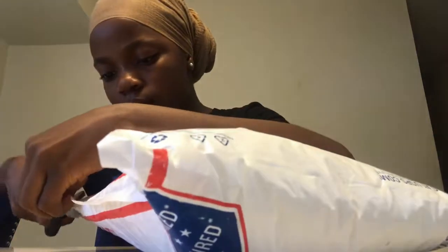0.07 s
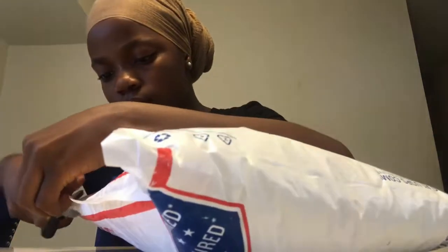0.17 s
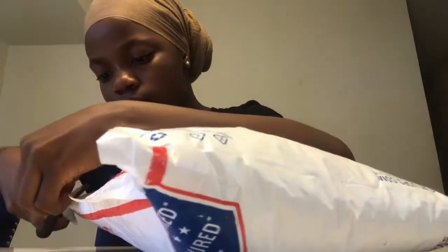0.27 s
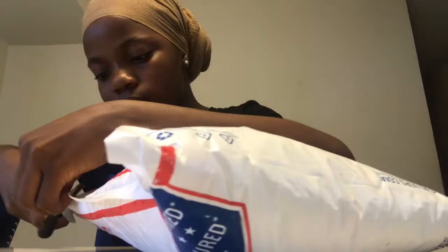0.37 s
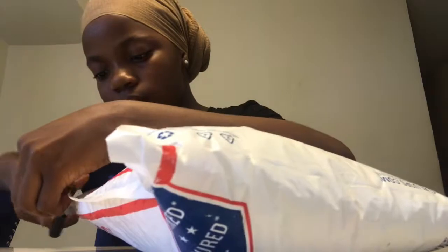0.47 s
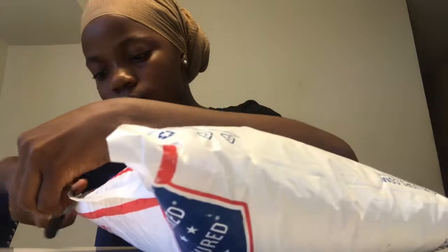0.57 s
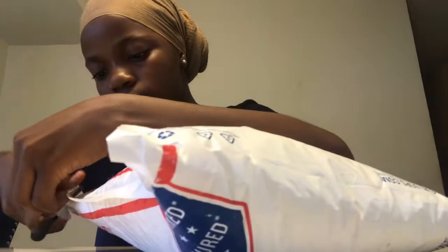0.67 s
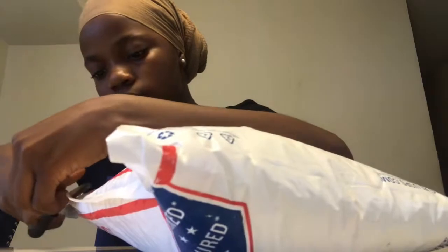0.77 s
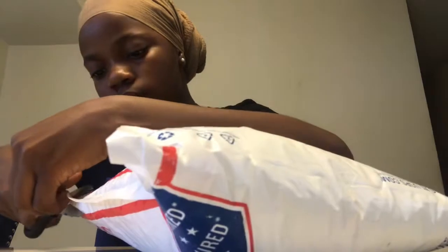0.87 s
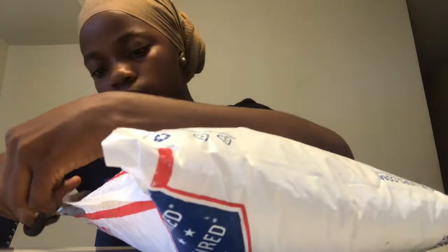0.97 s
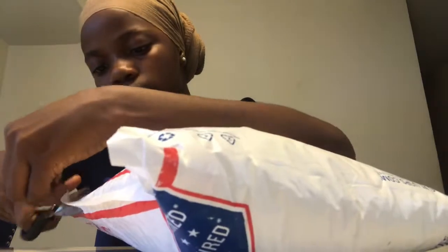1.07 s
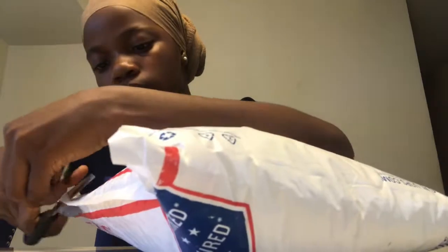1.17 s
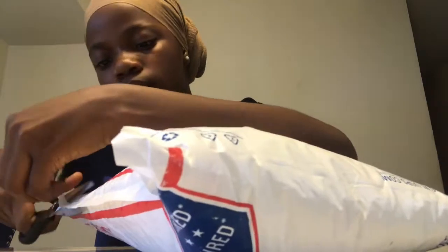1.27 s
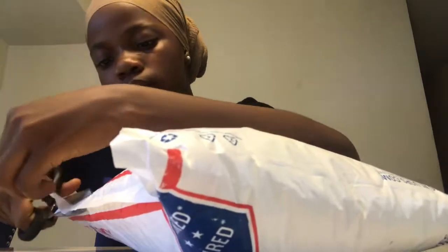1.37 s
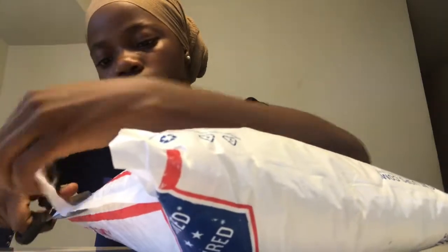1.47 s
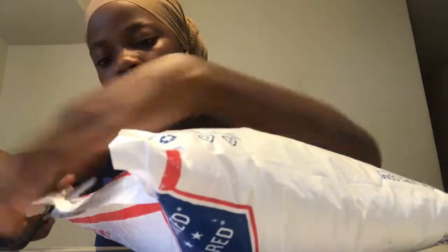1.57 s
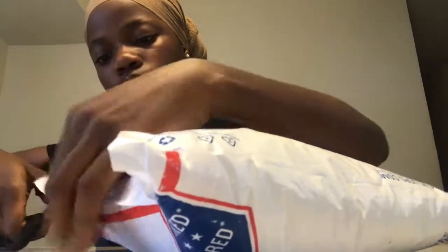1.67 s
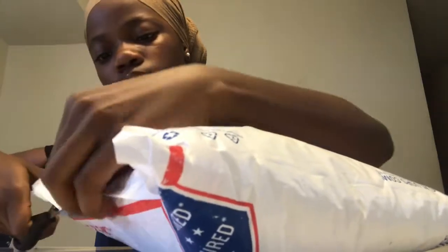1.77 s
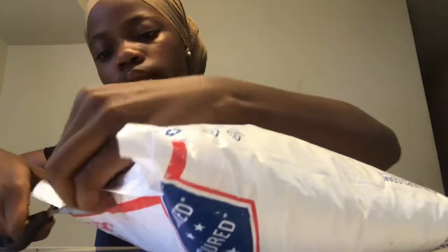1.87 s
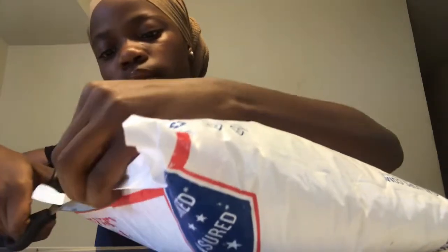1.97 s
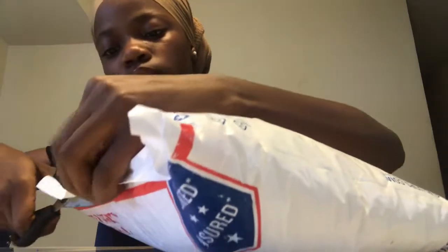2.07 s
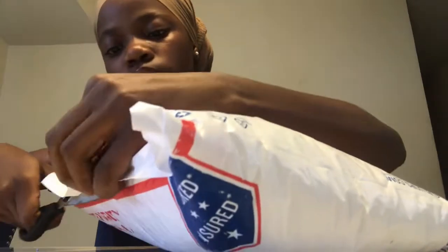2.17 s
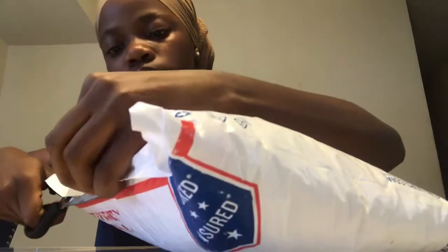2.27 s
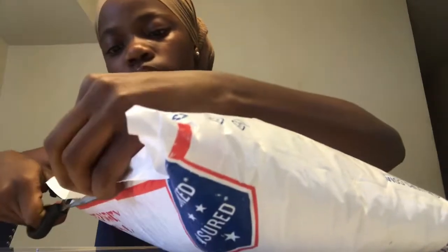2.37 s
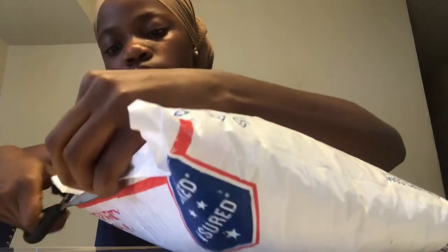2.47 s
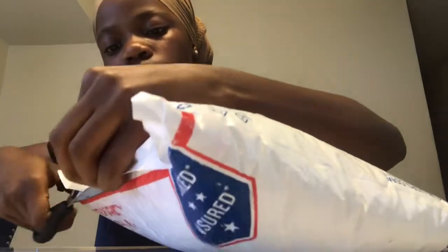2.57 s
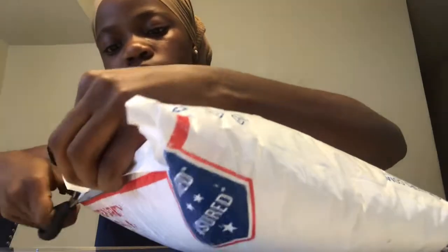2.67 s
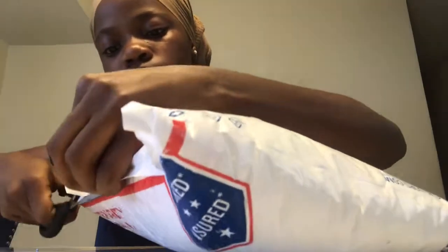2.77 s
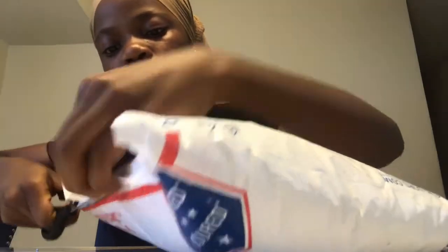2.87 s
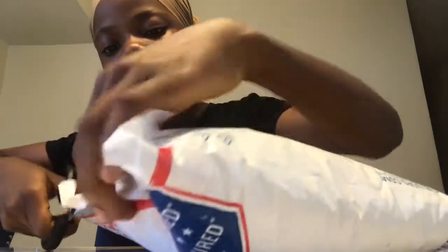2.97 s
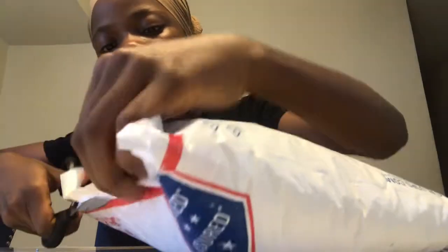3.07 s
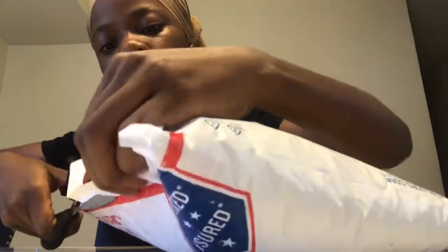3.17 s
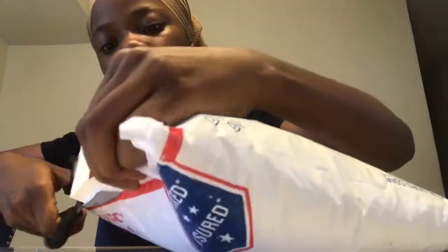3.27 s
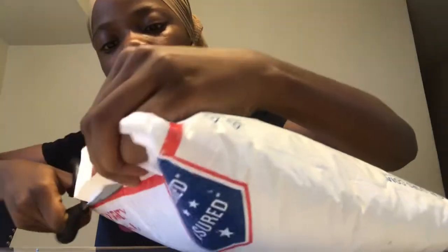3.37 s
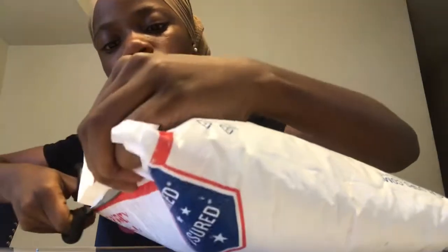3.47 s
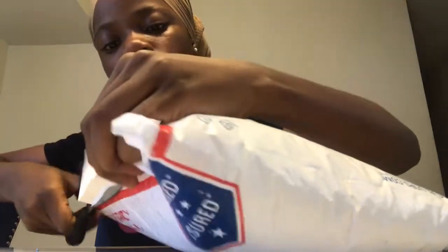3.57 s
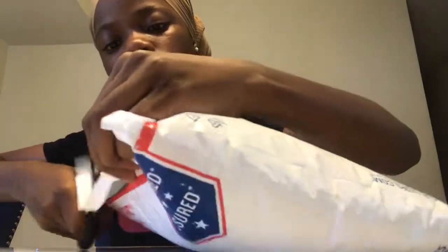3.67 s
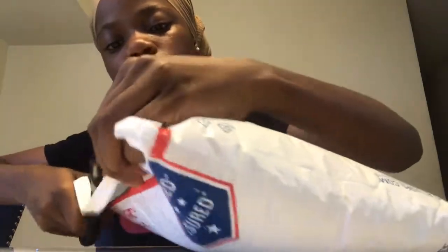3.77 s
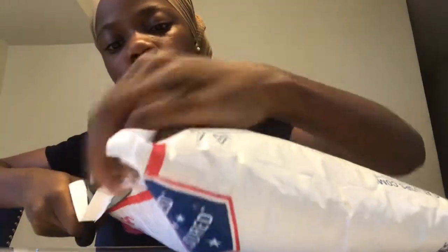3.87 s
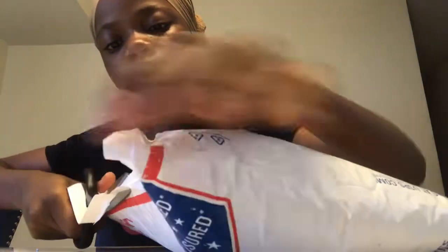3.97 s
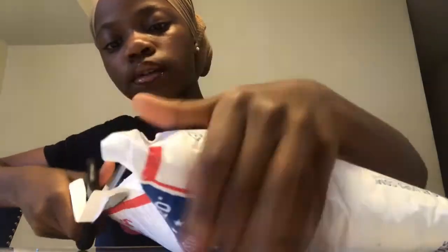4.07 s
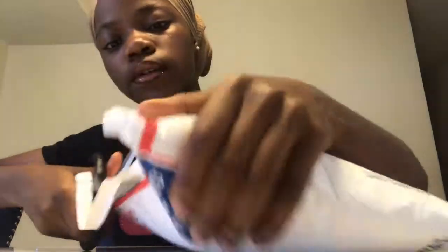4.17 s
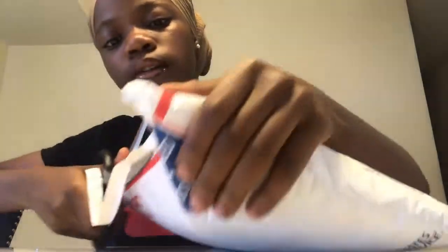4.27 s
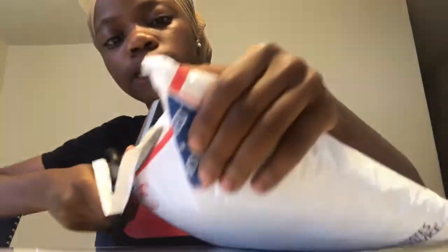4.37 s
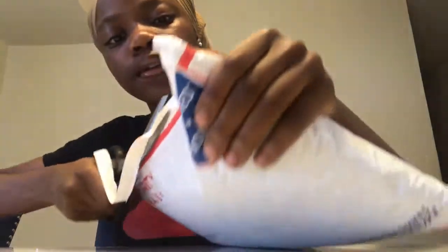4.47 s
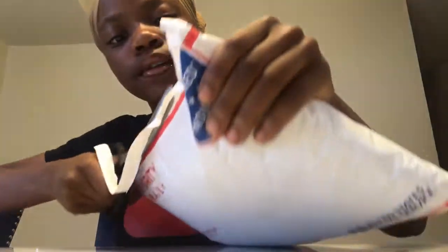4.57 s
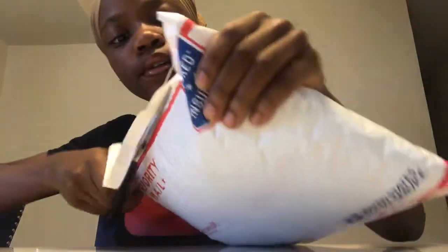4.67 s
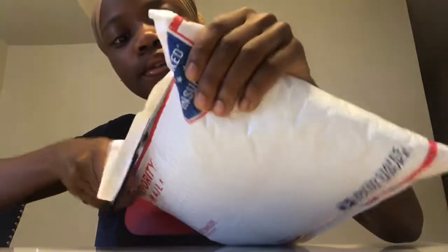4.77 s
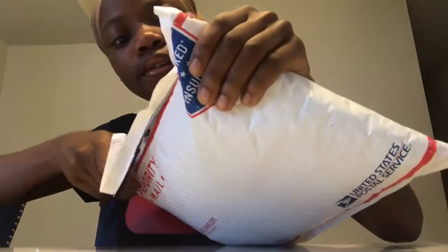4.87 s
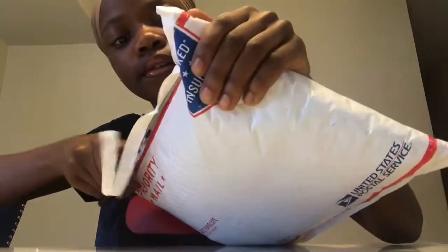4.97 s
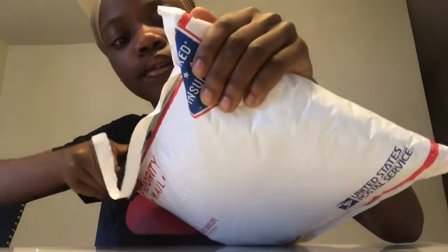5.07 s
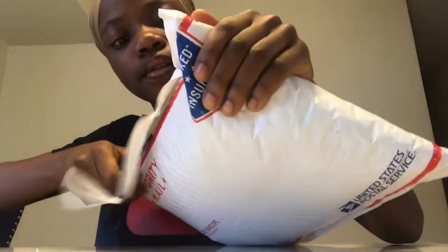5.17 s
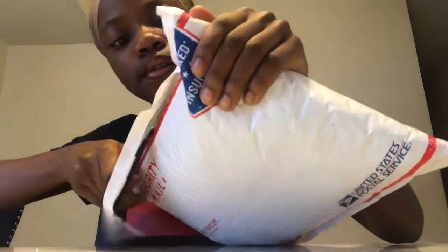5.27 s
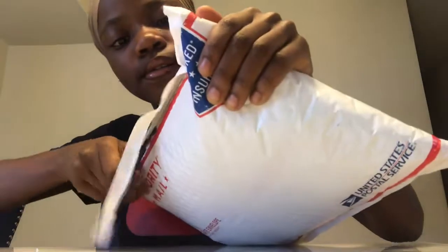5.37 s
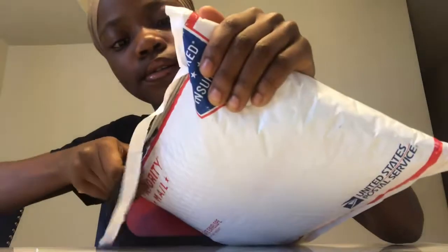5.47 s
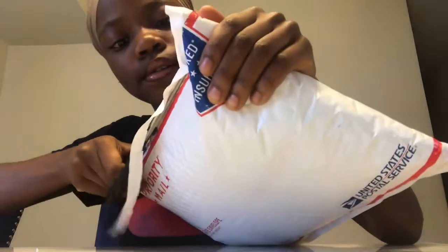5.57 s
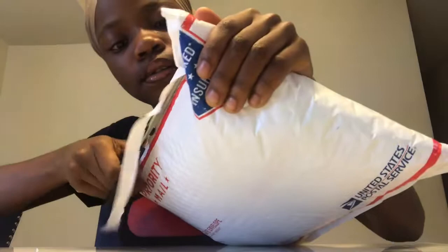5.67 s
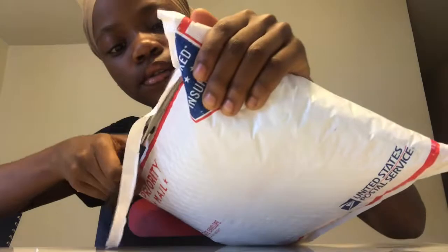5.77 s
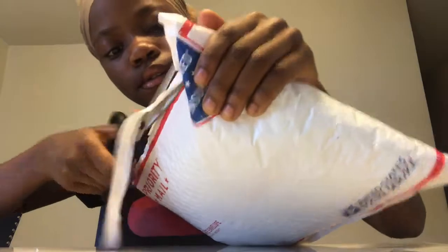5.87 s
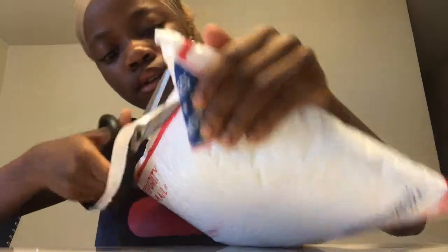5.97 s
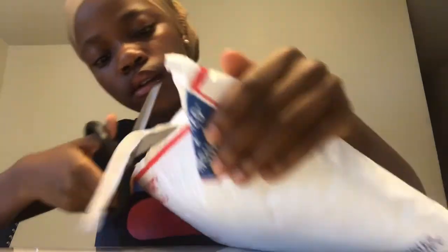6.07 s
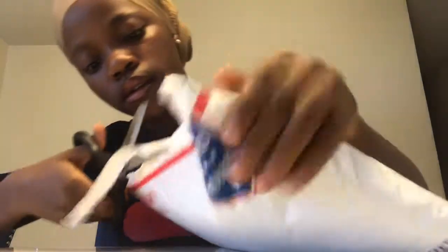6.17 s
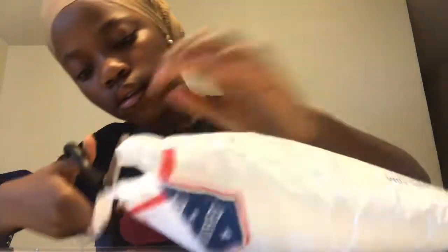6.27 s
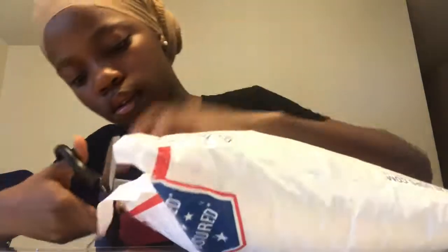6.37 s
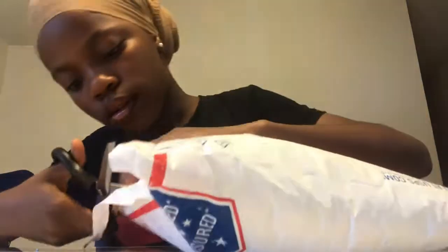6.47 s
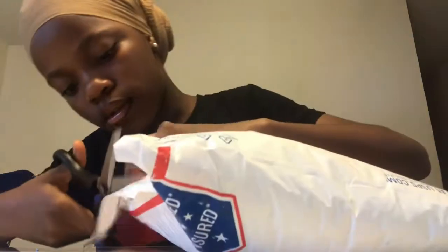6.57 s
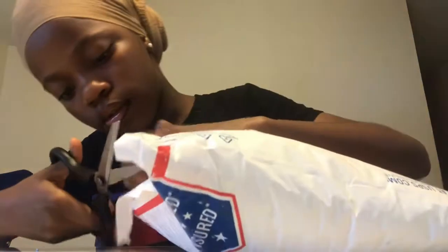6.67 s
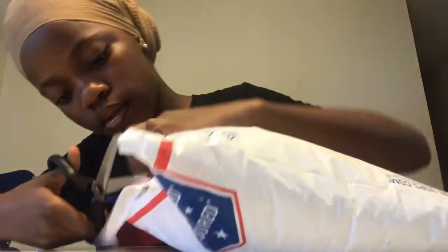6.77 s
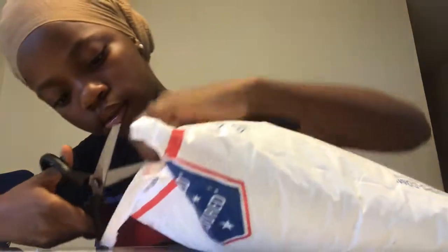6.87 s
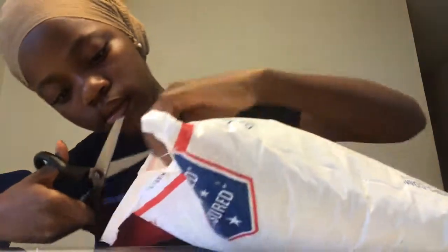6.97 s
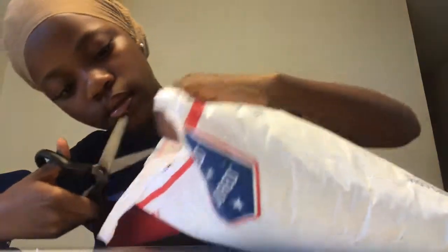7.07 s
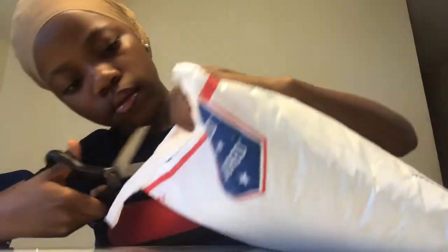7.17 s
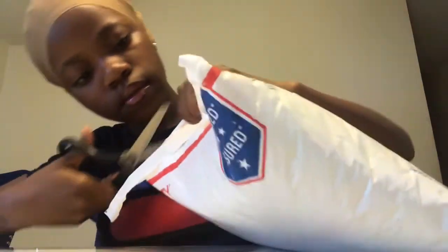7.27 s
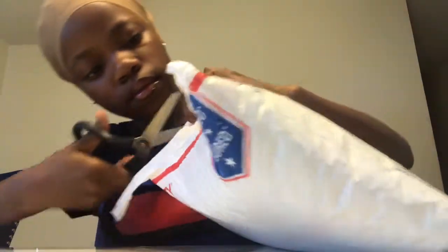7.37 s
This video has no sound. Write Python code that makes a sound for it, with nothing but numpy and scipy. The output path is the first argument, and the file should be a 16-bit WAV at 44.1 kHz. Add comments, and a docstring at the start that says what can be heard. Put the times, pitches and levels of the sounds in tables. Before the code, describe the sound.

A padded plastic mailer is handled and cut with scissors very near the microphone in a small, quiet room. From 0 to 1 s there are light crinkles, a small snap cluster near 0.1 and a firmer one with a soft thump around 0.5. From 1.2 to 2.9 s, dry cracks come steadily over short brushing rustles, a strong one near 1.6. At 3.0 s a loud sharp crack with a bump lands, then more crackling. Around 3.6 to 4.5 s the bag is shifted: dense rustle, snaps and the heaviest hollow thumps, near 4.0 to 4.1. From 4.7 to 6 s it is calmer, with scattered crinkles, bright ticks and muffled bumps. A vigorous crackling burst peaks at 6.25 to 6.5, another snap follows near 6.8, then it tapers into lighter rustling to about 7.4. Faint air and a low wavering hum continue throughout.

```python
"""Padded mailer gripped and cut

A padded plastic mailer is gripped, turned and snipped with scissors close to a microphone in a small room.
Creases snap as cracks with damped panel rings; strokes of the hand swell a rustle of tiny buckles and hiss.
Stiff edges tick, wrinkles let go, and the air-filled bag thumps as decaying tones under soft pushes.
Near walls answer with a faint noise tail over shaped-noise room air and a low wavering hum."""
import sys
import numpy as np
from scipy import signal
from scipy.fft import rfft, irfft, next_fast_len
from scipy.io import wavfile

SR = 44100
rng = np.random.default_rng(int(sys.argv[2]) if len(sys.argv) > 2 else 0)


def put_to_file(sound):
    """Save the sound as 16-bit audio at rate SR, in the file named by the first command-line argument."""
    columns = np.atleast_2d(sound).T  # one column per channel
    safe = np.clip(columns, -1, 1)
    whole_steps = np.round(safe * 32767)
    wavfile.write(sys.argv[1], SR, whole_steps.astype(np.int16))


N = 326781


def undb(db):
    """Decibels to gain."""
    return 10 ** (np.asarray(db) / 20)


def unit(x):
    """Scale to rms 1."""
    return x / np.sqrt(np.mean(x ** 2) + 1e-20)


def colour(points, hz):
    """Gain at hz from (Hz, dB) points, interpolated over log frequency."""
    point_hz, point_db = np.transpose(points)
    return undb(np.interp(np.log(hz + 1), np.log(point_hz), point_db))


def shape(x, gain_at):
    """Filter by a zero-phase gain that is a function of frequency."""
    size = next_fast_len(len(x) + 4096, True)
    hz = np.arange(size // 2 + 1) * SR / size
    return irfft(rfft(x, size) * gain_at(hz), size)[:len(x)]


def walk(knots_per_s):
    """Random wander: straight lines between normal random knots."""
    knots = rng.standard_normal(4096)
    return np.interp(np.arange(N) / SR * knots_per_s, np.arange(len(knots)), knots)


def ring(x, hz, q):
    """A damped resonance."""
    hz = min(hz, SR / 3)
    b, a = signal.iirpeak(hz, max(q, 3 * hz / SR), fs=SR)
    return signal.lfilter(b, a, x)


def edge(x, hz, kind, order=2):
    """Butterworth high-pass or low-pass."""
    b, a = signal.butter(order, min(hz, SR / 2.2), kind, fs=SR)
    return signal.lfilter(b, a, x)


def add(out, at_s, burst, db):
    """Mix in a burst whose energy equals that of 1 ms at the given rms level."""
    start = max(int(at_s * SR), 0)
    burst = burst * undb(db) * np.sqrt(SR / 1000 / np.sum(burst ** 2))
    out[start:start + len(burst)] += burst[:max(N - start, 0)]


def flip(t, noise, rise_s, fall_s, scrape):
    """Force of a buckle: noise builds up, a one-sample snap falls at t = 0, the scrape dies away."""
    snap = np.abs(t) < .5 / SR
    return snap + scrape * noise * np.exp(-np.abs(t) / np.where(t < 0, rise_s, fall_s))


def strokes(steepness=2.8, rest_db=-61, grip_knots_per_s=28, grip_db=1.14):
    """Drive of the film's middle, body and sizzle: each stroke is one rounded arch, summed in power."""
    # slides, squeezes and cuts: (peak time [s], swell to peak from half amplitude [s],
    # fade to half amplitude [s], level [dB], extra body [dB], extra sizzle [dB])
    stroke_rows = [(0.32, 0.04, 0.035, -44.5, -13, 4.5), (0.44, 0.04, 0.05, -46, -2, 4),
                   (0.504, 0.015, 0.025, -42.0, -13, 1.5), (0.565, 0.015, 0.028, -39.5, 5, -1),
                   (0.679, 0.016, 0.061, -50.5, 0, 2), (0.809, 0.049, 0.069, -45.0, -3, -1.5),
                   (0.977, 0.038, 0.051, -44.0, 9.5, 0.5), (1.152, 0.045, 0.11, -44.5, -1, -1),
                   (1.197, 0.014, 0.028, -34.5, -10, -28), (1.302, 0.015, 0.047, -47.0, 11.5, 1),
                   (1.429, 0.059, 0.046, -42.0, 1.5, -8), (1.595, 0.02, 0.04, -41.5, 8, -25),
                   (1.81, 0.089, 0.013, -44.0, -7, 1), (2.006, 0.16, 0.105, -41.5, 0, 1),
                   (2.277, 0.008, 0.028, -37, -2, -8), (2.333, 0.229, 0.146, -46.5, 3, -2.5),
                   (2.498, 0.008, 0.115, -41.5, 2, 0), (2.737, 0.056, 0.074, -45.0, 7, -4),
                   (2.924, 0.069, 0.124, -40.5, -2.5, -7), (3.019, 0.017, 0.017, -30, 8, -2),
                   (3.11, 0.06, 0.05, -42, 5.5, -1), (3.19, 0.025, 0.03, -41.5, 2, -8),
                   (3.406, 0.142, 0.072, -41.0, 2, -4), (3.647, 0.022, 0.095, -34.5, 0.5, -1.5),
                   (3.854, 0.07, 0.032, -37.5, -3.5, -4), (3.991, 0.083, 0.017, -41.0, 8, 3),
                   (4.003, 0.01, 0.021, -30.0, 4.5, -6.5), (4.149, 0.012, 0.014, -30, 13, 0.5),
                   (4.234, 0.071, 0.058, -35.0, -2, 2), (4.423, 0.06, 0.033, -33.0, -5, -11),
                   (4.525, 0.113, 0.087, -46.5, 11.5, 5), (4.695, 0.017, 0.049, -40.0, 7, 0),
                   (4.795, 0.028, 0.03, -42, 6, 6.5), (4.88, 0.06, 0.1, -53, 9.5, 1),
                   (5.065, 0.06, 0.03, -42, 8.5, -4), (5.143, 0.053, 0.042, -44.0, 10.5, 5.5),
                   (5.279, 0.037, 0.055, -40, 8.5, 1.5), (5.549, 0.13, 0.072, -50.0, 11.5, 5),
                   (5.741, 0.021, 0.103, -48.0, 11.5, 2), (5.875, 0.017, 0.095, -48.0, 11.5, 6),
                   (6.135, 0.101, 0.042, -39.5, 1, 1), (6.267, 0.028, 0.019, -35.0, 3.5, 2.5),
                   (6.368, 0.14, 0.054, -35.5, -4, 0), (6.486, 0.01, 0.042, -43.0, 5.5, -18),
                   (6.619, 0.014, 0.048, -33.5, -8, -3), (6.675, 0.147, 0.157, -42.5, 1.5, 7),
                   (6.787, 0.024, 0.049, -35.0, 6, 1), (6.943, 0.127, 0.086, -46.0, 0.5, 3),
                   (7.16, 0.08, 0.08, -45.0, 4, 4.5), (7.34, 0.08, 0.1, -47.0, 2, 2)]
    t = np.arange(N) / SR
    # between strokes the held bag still stirs
    power = np.full((3, N), undb(rest_db) ** 2)
    for peak_s, swell_s, fade_s, db, body_db, sizzle_db in stroke_rows:
        distance = np.maximum((peak_s - t) / swell_s, (t - peak_s) / fade_s)
        arch = 1 / (1 + distance ** steepness)
        power += np.outer(undb([db, db + body_db, db + sizzle_db]), arch) ** 2
    # the grip slips and catches
    return np.sqrt(power) * undb(grip_db * walk(grip_knots_per_s))


def rustle(drive, slide_db=-11, slide_hz=4200, flicker_db=4.5, mid_db=1.0, body_db=0, sizzle_db=1.0):
    """Buckling carries the middle of the rustle; the hiss of sliding film takes over in the treble."""
    # colour of the rustling film: (frequency [Hz], spectrum level [dB])
    film_colour = [(35, 3), (130, -7), (370, -7.5), (720, -5.5), (1100, -0.5), (2000, -5), (4200, -7.5),
                   (6300, -10), (10000, -15.5), (16000, -14)]

    def slide(f):
        return undb(slide_db) + f / slide_hz

    def buckle_gain(f):
        return colour(film_colour, f) / np.hypot(1, slide(f))

    hiss = unit(rng.standard_normal(N) * undb(flicker_db * walk(260)))
    film = unit(shape(buckles(), buckle_gain) + shape(hiss, lambda f: buckle_gain(f) * slide(f)))
    body = shape(film, lambda f: 1 / (1 + (f / 750) ** 4) - .7 / (1 + (f / 200) ** 4))
    sizzle = shape(film, lambda f: 1 - 1 / (1 + (f / 3500) ** 4))
    bands = np.array([film - body - sizzle, body, sizzle])
    return undb([mid_db, body_db, sizzle_db]) @ (drive * bands)


def buckles(rate_per_s=2400, spread_db=3.0, largest_db=15, q=4.3, cluster_db=3):
    """Tiny facets flip in swarms, each ringing a few cycles at its own pitch; scaled to rms 1."""
    # clusters: the fingers stick and slip
    chance = rate_per_s / SR * undb(cluster_db * walk(80))
    born = np.flatnonzero(rng.random(N) < chance)
    smallness, phase = rng.random((2, len(born), 1))
    size = undb(np.minimum(spread_db * rng.exponential(size=(len(born), 1)), largest_db))
    hz = 250 + 16000 * smallness ** 2
    age = np.arange(400)
    cycles = hz * age / SR
    envelope = np.exp(-np.pi * cycles / q) * (1 - np.exp(-2 * cycles))
    # hz ** .75 evens out the average spectrum
    rings = np.sin(2 * np.pi * (cycles + phase)) * envelope * size * hz ** .75
    return unit(np.bincount((born[:, None] + age).ravel(), rings.ravel(), N)[:N])


def creases(rows, ring_q=1.13, q_scatter=0.32, crack_q=2.53, rise_s=0.00055, fall_s=0.001,
            scrape=0.17, broad=0.38, rebound_db=-21):
    """A crease flips: its edge cracks, the panel beside it rings briefly, and a small rebound follows."""
    out, t = np.zeros(N), np.arange(-60, 700) / SR
    for at_s, ring_hz, ring_db, crack_hz, crack_db in rows:
        noise = rng.standard_normal((2, len(t)))
        panel_push, edge_push = flip(t, noise, rise_s, fall_s, scrape)
        # taut panels ring longer than slack ones
        q = ring_q * np.exp(q_scatter * rng.standard_normal())
        panel = ring(panel_push, ring_hz, q)
        panel = ring(panel, ring_hz, q) + broad * panel
        panel = edge(edge(panel, 200, "high"), 4600, "low")
        crack = ring(edge_push, crack_hz, crack_q)
        crack = edge(edge(crack, 1080, "high"), SR / 2.2, "low")
        rebound = (rng.uniform(0.0034, 0.011), rebound_db + 3 * rng.standard_normal())
        for lag_s, db in ((0, 0), rebound):
            add(out, at_s + t[0] + lag_s, panel, ring_db + db)
            add(out, at_s + t[0] + lag_s, crack, crack_db + db)
    return out


def small_creases(effort, rate_per_s=14, size_db=-37.0, spread_db=3.5, follow=.55, ring_hz=1450,
                  crack_hz=4000, crack_db=-1.5, scatter=0.26):
    """Rows for lesser creases, which give way at random: more often and harder with more effort."""
    strain = (effort / np.median(effort)) ** follow
    count = int(rate_per_s * N / SR)
    at = np.searchsorted(np.cumsum(strain) / np.sum(strain), rng.random(count))
    level_db = size_db + 20 * np.log10(strain[at])
    rows = []
    for i, db, (a, b, c, d) in zip(at, level_db, rng.standard_normal((count, 4))):
        panel = (ring_hz * np.exp(scatter * a), db + spread_db * b)
        crack = (crack_hz * np.exp(scatter * c), db + crack_db + spread_db * d)
        rows.append((i / SR, *panel, *crack))
    return rows


def ticks(hz=12000, q=3.0, fall_s=0.00066, scrape=1.0):
    """Stiff edges of taut film and blades let go with a very short, bright ring."""
    # glassy ticks: (time [s], relative level over 1 ms [dB])
    tick_rows = [(3.0154, -14), (3.7913, -27), (4.141, -26), (4.4644, -39), (4.4936, -34), (4.689, -29.5),
                 (5.0403, -30), (5.169, -34), (5.415, -27), (5.4646, -27), (5.6547, -32.5), (5.7359, -36.5),
                 (5.818, -39), (5.917, -33), (6.0059, -33), (6.0663, -39), (6.147, -30), (6.247, -29),
                 (6.288, -33), (6.6087, -33), (6.6154, -27)]
    out, t = np.zeros(N), np.arange(-30, 300) / SR
    for at_s, db in tick_rows:
        push = flip(t, rng.standard_normal(len(t)), .0001, fall_s, scrape)
        add(out, at_s + t[0], edge(ring(push, hz, q), 7200, "high"), db)
    return out


def wrinkles(effort, rate_per_s=45, size_db=-45, spread_db=5.0, follow=0.35, q=3.2, lateness=1.3):
    """Lone wrinkles let go with fine ticks, denser towards the end and louder with effort."""
    out, t = np.zeros(N), np.arange(200) / SR
    strain_db = follow * 20 * np.log10(effort / np.median(effort))
    for turn, small, rare in rng.random((int(rate_per_s * N / SR), 3)):
        at_s = turn ** (1 / lateness) * N / SR
        # a few stand out
        db = size_db + strain_db[int(at_s * SR)] - spread_db * np.log(rare + np.exp(-2.5))
        push = flip(t, rng.standard_normal(len(t)), 1 / SR, .0003, .35)
        tick = ring(push, 2000 * 5 ** small, q)
        add(out, at_s, edge(tick, 730, "high"), db)
    return out


def thumps(q=2.36, contact_s=0.0014, flutter=0.24, sag=0.39, sag_cycles=3.0, heave_hz=75, heave_db=-13):
    """The bag's air cushion bounces for a few cycles under a soft push, and the whole parcel heaves."""
    # pushes on the bag: (time [s], nominal pitch [Hz], relative level over 1 ms [dB])
    thump_rows = [(0.5608, 327, -26), (0.5694, 334, -32), (1.615, 170, -31.5), (2.982, 394, -25.5),
                  (3.0234, 240, -20), (3.1654, 574, -25.5), (3.679, 450, -29), (3.8393, 666, -29),
                  (4.0166, 267, -19.5), (4.0815, 210, -28), (4.1288, 250, -16), (4.585, 330, -35),
                  (4.7, 415, -27), (5.0364, 515, -29), (5.2647, 514, -24), (5.5359, 360, -25.5),
                  (5.7353, 430, -29), (6.249, 500, -44), (6.6516, 298, -25), (6.787, 417, -29),
                  (7.1448, 280, -30)]
    out, t = np.zeros(N), np.arange(3000) / SR
    for at_s, hz, db in thump_rows:
        push = (t == 0) + flutter * rng.standard_normal(len(t)) * np.exp(-t / contact_s)
        # the pitch sags as the cushion gives
        pitch_hz = hz * (0.73 + sag * np.exp(-t * hz / sag_cycles))
        bounce = np.sin(2 * np.pi * np.cumsum(pitch_hz) / SR) * np.exp(-np.pi * hz * t / q)
        cushion = signal.fftconvolve(push, bounce)[:len(t)]
        add(out, at_s, edge(cushion, 75, "high"), db)
        add(out, at_s, ring(ring(push, heave_hz, 0.81), heave_hz, 0.43), db + heave_db)
    return out


def room(x, t60_s=0.19, tail_db=-21, dull_hz=6000, gap_s=.006):
    """The walls return a faint, short tail of decaying noise."""
    t = np.arange(SR // 2) / SR
    tail = edge(rng.standard_normal(len(t)), dull_hz, "low", order=1)
    tail *= undb(-60 * t / t60_s) * (t > gap_s)
    tail *= undb(tail_db) / np.sqrt(np.sum(tail ** 2))
    return x + signal.fftconvolve(x, tail)[:N]


def background(air_db=-56.5, hum_hz=143, hum_db=-61):
    """Room air as shaped noise, and an appliance hum that wavers in pitch and level."""
    # colour of quiet room air: (frequency [Hz], spectrum level [dB])
    air_colour = [(20, -14), (60, 7), (110, 3), (280, -2), (700, -7), (1100, -11), (2600, -22), (9000, -29),
                  (16000, -46)]
    air = unit(shape(rng.standard_normal(N), lambda f: colour(air_colour, f)))
    pitch_hz = hum_hz + 3.36 * walk(10)
    hum = np.sin(2 * np.pi * np.cumsum(pitch_hz) / SR) * undb(walk(3.2))
    return undb(air_db) * air + undb(hum_db) * unit(hum)


def scene(cavity_q=11):
    """Strokes work the film, the film sets the air in the bag ringing, and the room answers."""
    # loudest creases: (time [s], panel ring [Hz], relative ring level over 1 ms [dB],
    # edge crack [Hz], relative crack level over 1 ms [dB])
    crease_rows = [(0.0591, 1700, -34.5, 5330, -34), (0.1043, 1150, -37, 2850, -29.5),
                   (0.1396, 1880, -31, 5700, -28), (0.1472, 1510, -29.5, 6350, -35),
                   (0.4294, 1720, -33, 4870, -33), (0.4532, 1680, -45, 4510, -36),
                   (0.5005, 1500, -23.5, 3900, -32), (0.5602, 1110, -31, 3560, -29.5),
                   (1.1675, 2360, -23, 3050, -35), (1.2394, 920, -37, 5370, -40),
                   (1.2917, 1470, -26.5, 4500, -22), (1.3225, 1090, -33.5, 4000, -39),
                   (1.3782, 1780, -31.5, 3700, -40), (1.4371, 1640, -26, 6960, -33),
                   (1.4568, 1590, -33, 4200, -31), (1.5521, 1110, -34, 4120, -23.5),
                   (1.5852, 1270, -17, 3640, -23.5), (1.5996, 1300, -32, 4350, -43),
                   (1.7523, 1270, -25, 4640, -31), (1.8023, 1320, -21, 2660, -24),
                   (1.8717, 1120, -30, 6300, -23.5), (1.9751, 1220, -29, 4400, -21.5),
                   (2.0248, 1950, -33, 3580, -29), (2.088, 1260, -25, 4870, -28.5),
                   (2.1037, 1250, -34, 5130, -28), (2.1614, 1940, -44, 4040, -30.5),
                   (2.2433, 1050, -30, 3590, -51), (2.3536, 1370, -46, 4770, -31),
                   (2.4328, 1380, -35, 3550, -27), (2.4972, 1240, -27.5, 3580, -30),
                   (2.5038, 1320, -26, 3000, -28), (2.6017, 1190, -29, 4120, -29.5),
                   (2.669, 1460, -29, 3440, -30.5), (2.7283, 1410, -30, 3850, -27),
                   (2.8915, 1410, -23, 4930, -27.5), (2.8988, 1390, -27, 3580, -30.5),
                   (2.95, 1350, -27, 5700, -31), (2.979, 1850, -25, 3290, -35),
                   (3.0154, 1170, -16, 3780, -8.5), (3.0237, 660, -15, 6000, -35),
                   (3.1156, 1820, -27, 2680, -24.5), (3.1651, 2100, -25.5, 3420, -16.5),
                   (3.1954, 970, -27.5, 2700, -29), (3.2754, 1530, -36, 3800, -25.5),
                   (3.6262, 1510, -27, 4080, -26), (3.6402, 1200, -23, 5600, -27),
                   (3.6727, 1040, -23, 3980, -22.5), (3.6796, 880, -18.5, 5460, -23),
                   (3.7494, 1820, -31.5, 4120, -27), (3.7914, 1160, -32, 5000, -19),
                   (3.7953, 1180, -28, 5200, -21), (3.8416, 1180, -29, 4860, -23.5),
                   (3.8631, 870, -42, 3250, -18), (4.0014, 1340, -19, 4300, -22.5),
                   (4.0112, 680, -17, 2700, -16.5), (4.0802, 1190, -25.5, 4300, -31),
                   (4.1282, 640, -22, 2700, -43), (4.1417, 1030, -17, 6600, -30),
                   (4.1493, 930, -20, 3300, -21.5), (4.1655, 2440, -40, 3620, -18),
                   (4.1838, 1080, -35, 3830, -43), (4.2236, 1280, -29, 3030, -25),
                   (4.2372, 1320, -22.5, 3300, -22.5), (4.2454, 1150, -29, 5700, -23),
                   (4.3034, 1420, -32, 5000, -27), (4.3995, 1300, -18, 2700, -26),
                   (4.4324, 1330, -16, 3300, -32), (4.494, 1440, -19, 5500, -33),
                   (4.6905, 1040, -18, 2700, -27.5), (4.7883, 1380, -31.5, 4900, -26),
                   (4.8168, 2050, -28.5, 6200, -28), (4.8395, 1130, -28, 2700, -52),
                   (5.0621, 1350, -29, 4620, -31), (5.0727, 1390, -28, 4080, -39),
                   (5.1435, 940, -27, 4340, -32), (5.2659, 960, -27, 4220, -35),
                   (5.278, 1240, -27, 4000, -51), (5.4151, 1040, -28.5, 8200, -36),
                   (5.4646, 2180, -25, 4330, -42), (5.487, 1430, -28, 5800, -56),
                   (5.5343, 850, -22.5, 2660, -29.5), (5.7357, 1500, -24.5, 2940, -27.5),
                   (5.8182, 1970, -42, 5600, -26.5), (5.9158, 835, -35, 4800, -29),
                   (6.033, 950, -33.5, 5300, -31), (6.0999, 1340, -22, 2700, -32),
                   (6.1352, 1600, -32, 3000, -33), (6.1473, 2000, -31, 5400, -29),
                   (6.248, 1100, -21.5, 3200, -24), (6.2703, 1020, -21, 3240, -18),
                   (6.274, 1720, -24, 2840, -22), (6.3369, 1920, -27, 3960, -26),
                   (6.3436, 1240, -36, 3800, -22), (6.3524, 2440, -42, 3900, -20),
                   (6.3821, 1420, -35, 2700, -23), (6.3926, 1400, -18.5, 3600, -26),
                   (6.4, 1580, -15.5, 3720, -12), (6.4245, 2250, -27, 3000, -13.5),
                   (6.4302, 1560, -25, 4300, -26), (6.4844, 1620, -14, 2940, -20),
                   (6.6155, 1410, -29.5, 6840, -21), (6.6525, 930, -22, 3380, -40),
                   (6.6568, 980, -20, 3400, -37), (6.7225, 1770, -20, 3400, -38),
                   (6.7761, 1130, -35, 7050, -22), (6.7873, 1080, -15.5, 3400, -18),
                   (6.808, 1210, -34, 5940, -24.5), (6.8305, 1340, -26.5, 2830, -25),
                   (6.925, 1290, -32, 3960, -27.5), (7.0986, 1630, -38, 5670, -30),
                   (7.1241, 980, -28, 2900, -40), (7.1553, 1150, -25.5, 6300, -24),
                   (7.1968, 1050, -25.5, 3040, -28.5)]
    # hollow resonances of the air inside the bag: (frequency [Hz], level [dB])
    cavity_modes = [(238, -26), (590, -13.5), (990, -15)]
    drive = strokes()
    effort = drive[0]
    film = rustle(drive) + wrinkles(effort)
    film += undb(4.0) * ticks() + undb(-0.4) * thumps()
    film += undb(0.5) * creases(crease_rows) + creases(small_creases(effort))
    cavity = sum(undb(db) * ring(film, hz, cavity_q) for hz, db in cavity_modes)
    return (room(film + cavity) + background())[None]


def record(dry, top_hz=15900):
    """The lowest bass is rolled off and the microphone colours the treble; the recorder cuts the top steeply."""
    # bass roll-off and microphone colour: (frequency [Hz], gain [dB])
    mic_colour = [(22, -15), (55, -0.5), (2000, -1), (3200, -1), (4450, -2), (4850, -4.5), (5700, -1),
                  (9500, -2), (10400, -5), (11200, -2.5), (13700, -4), (14900, -6.5)]
    heard = shape(dry[0], lambda f: colour(mic_colour, f))[None]
    return signal.sosfilt(signal.ellip(8, .2, 70, top_hz, fs=SR, output="sos"), heard)


dry = scene()
out = record(dry)
put_to_file(out)
```